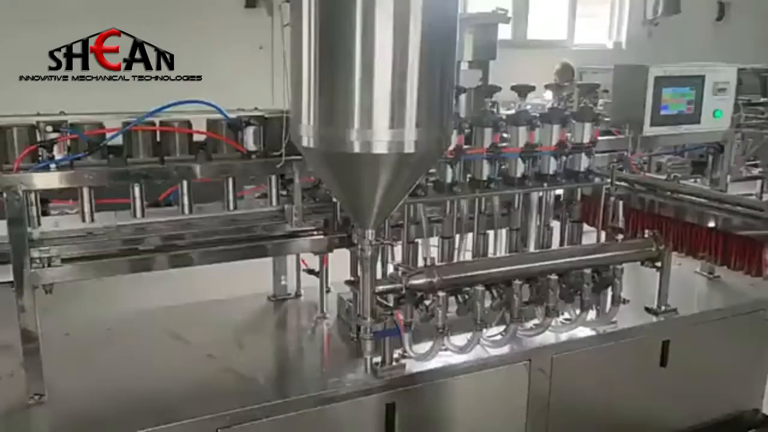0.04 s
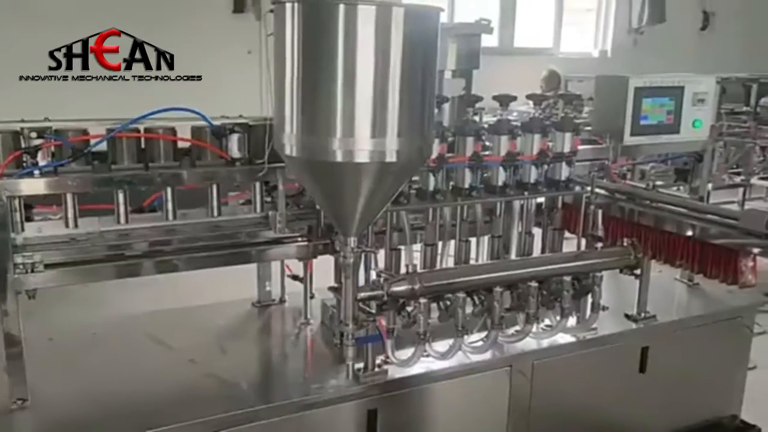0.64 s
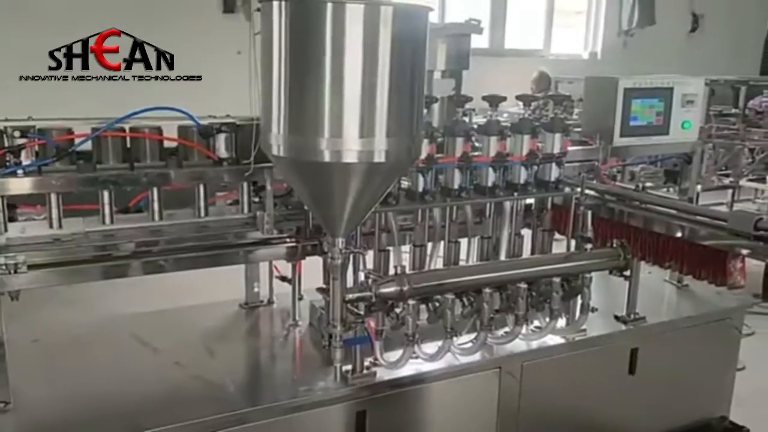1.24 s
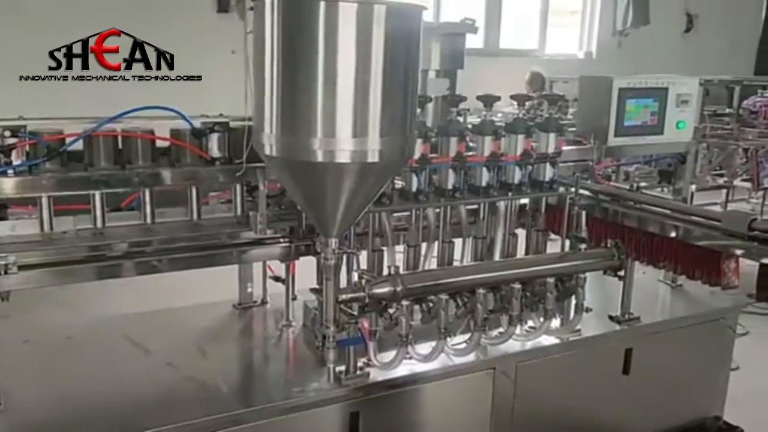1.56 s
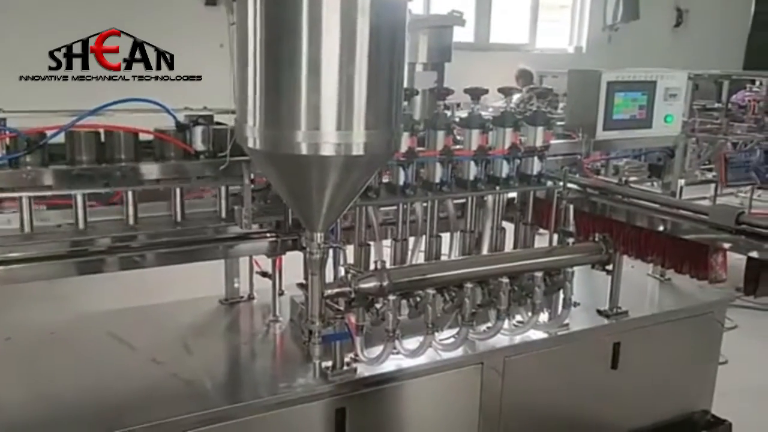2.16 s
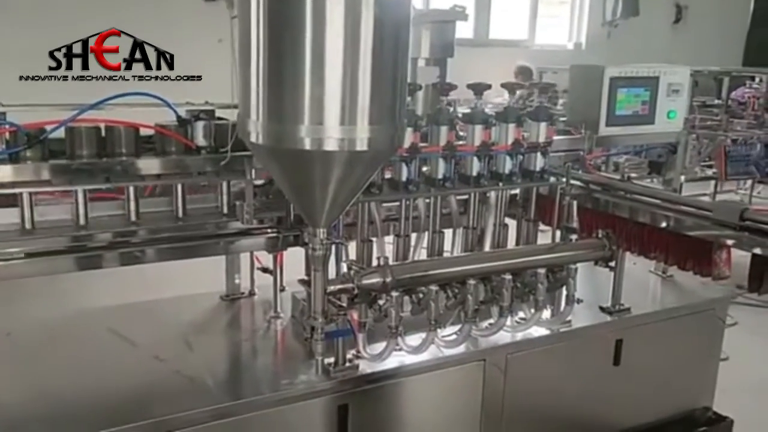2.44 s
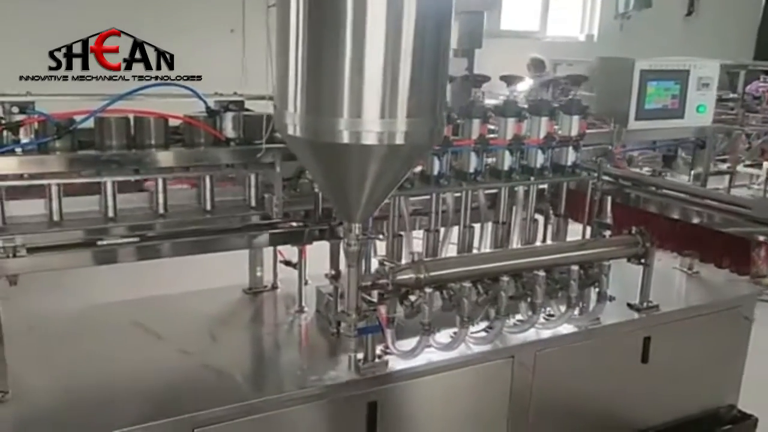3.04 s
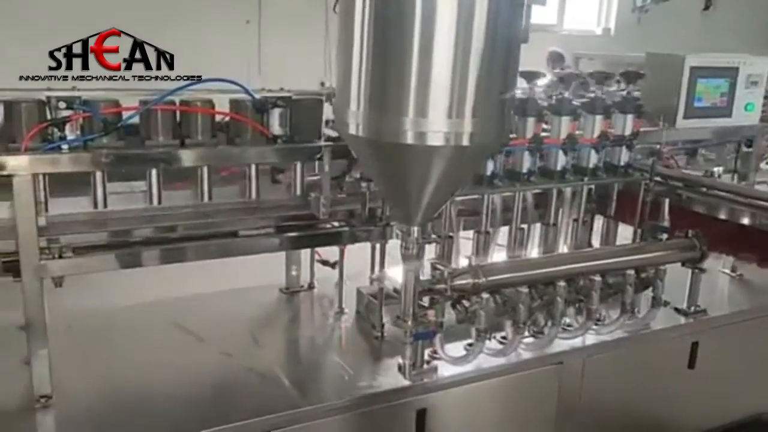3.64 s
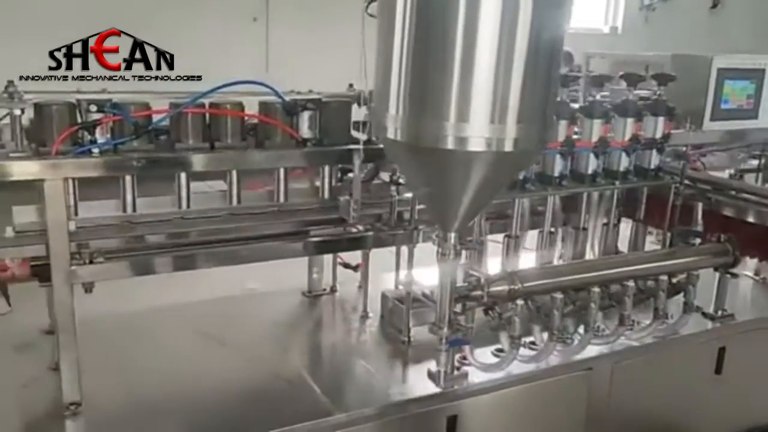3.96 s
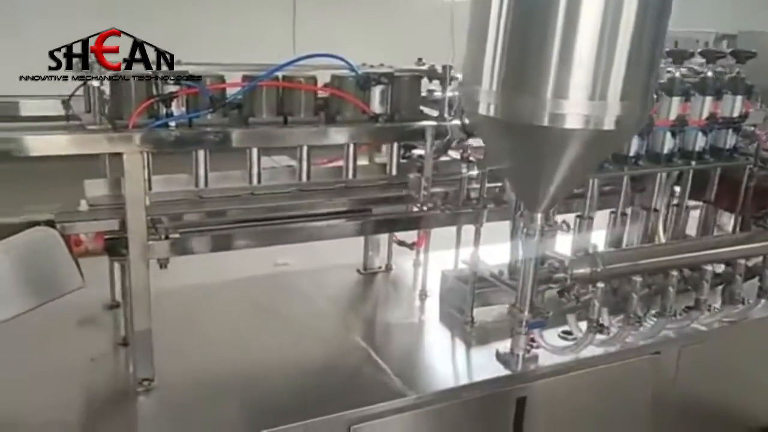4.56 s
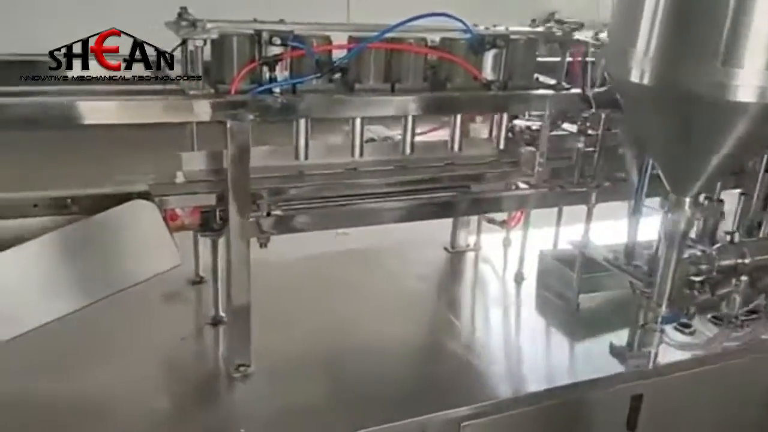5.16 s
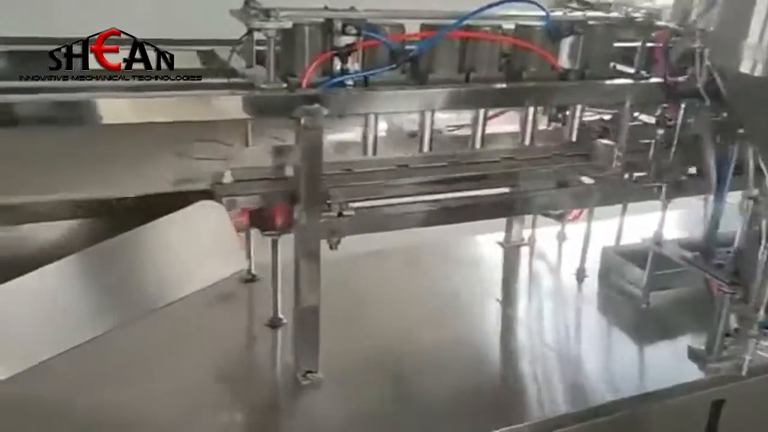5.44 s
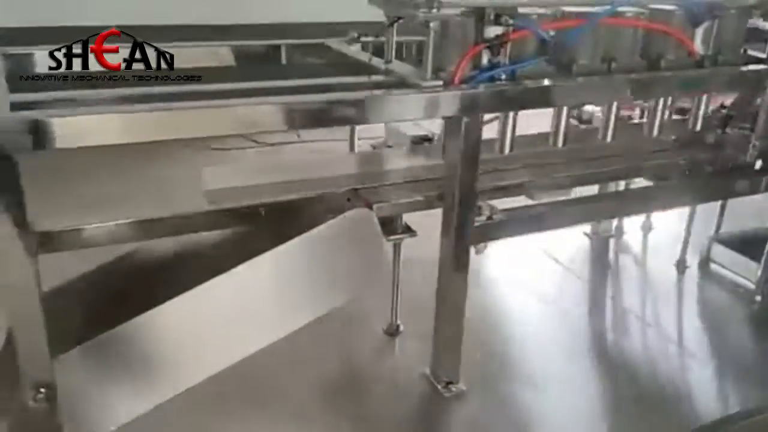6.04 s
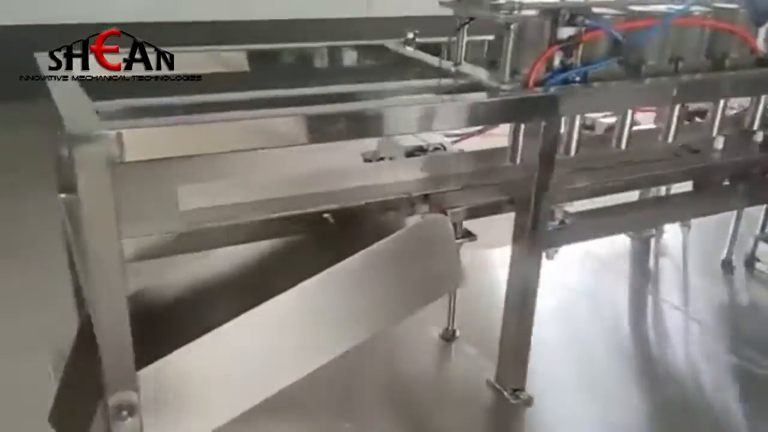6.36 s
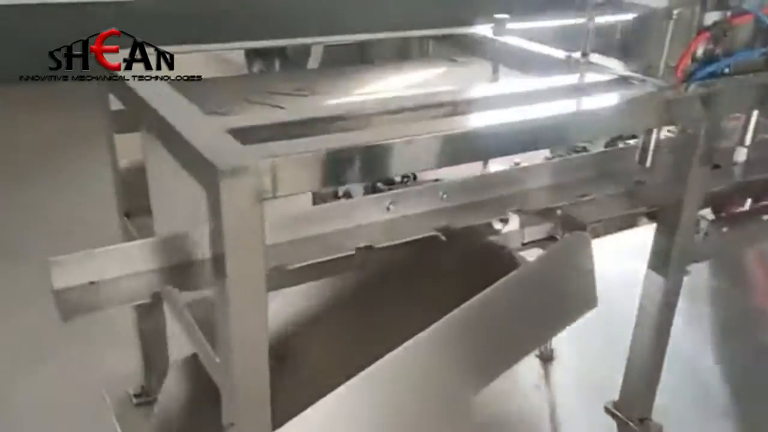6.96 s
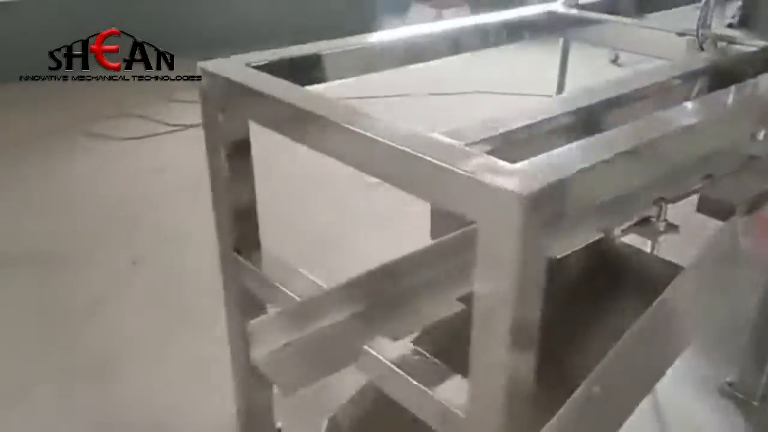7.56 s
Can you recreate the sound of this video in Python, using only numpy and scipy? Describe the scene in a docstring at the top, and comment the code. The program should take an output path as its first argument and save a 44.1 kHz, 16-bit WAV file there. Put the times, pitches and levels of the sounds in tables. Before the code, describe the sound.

A steady workshop rush with a thin leak whine fades in, and a slide on a nearby pneumatic filling machine scrapes and clanks into its stop at 0.4 seconds. At 0.8 a valve switches with a thump and a puff whose whistle falls. At 1.3 a high, sinking whistle starts along with a bright air hiss, which surges at 1.8 and fades until about 4 seconds, with knocks, sliding rumble and another whistling puff at 3.3. A short, loud air blast and thump come at 4.8, followed by a clank. A second long hiss runs from 5.3 to 7 seconds over rumbling, scraping carriages, with a cluster of steel clanks and sharp nozzle spits from 6 seconds. A small puff and clank follow at 7.3, and a last clank and spit at 7.8. Hard walls add a short echo.

```python
"""A pneumatic filling machine cycles in a hard-walled workshop. The shop's steady rush fades in;
a slide rumbles and clanks into its stop. From 0.8 s valves switch: a thump and a puff whose whistle
sinks with the pressure. At 1.3 s a throttle whistles and a cylinder bleeds off, hissing until 4 s.
A short blast at 4.8 s precedes a second long hiss, 5.3-7 s, over sliding carriages, clanks and
spitting nozzles. A last clank and spit come at 7.8 s."""
import sys
import numpy as np
from scipy import signal
from scipy.fft import rfft, irfft, next_fast_len
from scipy.io import wavfile
from scipy.ndimage import uniform_filter1d

SR = 44100
rng = np.random.default_rng(int(sys.argv[2]) if len(sys.argv) > 2 else 0)


def master(y):
    """Save y as 16-bit WAV."""
    cut = np.clip(np.atleast_2d(y).T, -1, 1)
    pcm = np.round(cut * 32767)  # scale
    wavfile.write(sys.argv[1], SR, pcm.astype(np.int16))


N = 344421

# air jet spectrum: f/Hz, density/dB
AIR_SPECTRUM = [(200, -26), (700, -13), (1600, -7.5), (3200, -1.5), (5200, 5), (6600, 3), (8300, -5.5),
                (11500, -6.5), (13000, 0.5), (14300, -11)]


def amp(db):
    return 10 ** (np.asarray(db) / 20)


def unit(x):
    return x / np.sqrt(np.mean(x ** 2) + 1e-20)


def along(points, hz):
    """Interpolate (f/Hz, value) points on a log axis."""
    f, v = np.transpose(points)
    return np.interp(np.log(hz + 1), np.log(f + 1), v)


def since(start_s):
    """Elapsed time/s, zero before the start."""
    return np.maximum(np.arange(N) / SR - start_s, 0)


def gate(on_s, off_s, rise_s, fall_db_per_s):
    """Attack-hold-release gain."""
    return np.minimum(since(on_s) / rise_s, 1) * amp(-fall_db_per_s * since(off_s))


def strike(t60_s, rise_s):
    """Quick rise, exponential decay; 1 s long."""
    t = np.arange(SR) / SR
    return (1 - np.exp(-t / rise_s)) * np.exp(-np.log(1000) * t / t60_s)


def wobble(rate_hz, size=N):
    """Random curve, linear between Gaussian knots."""
    return np.interp(np.arange(size) * rate_hz / SR, np.arange(size // 8), rng.standard_normal(size // 8))


def pan(db):
    """Channel gains for a left-right difference."""
    return amp([[db / 2], [-db / 2]])


def add(track, start_s, sound):
    """Mix a sound into the track in place."""
    part = track[:, max(round(start_s * SR), 0):][:, :sound.shape[-1]]
    part += sound[..., :part.shape[1]]


def filtered(x, gain_db):
    """Apply gain_db(f/Hz)."""
    m = next_fast_len(N + SR // 4)
    return irfft(rfft(x, m) * amp(gain_db(np.fft.rfftfreq(m, 1 / SR))), m)[:, :N]


def resonant(x, peaks):
    """Colour by resonances: f/Hz, width/Hz, gain/dB."""
    return filtered(x, lambda hz: sum(db / (1 + ((hz - f) / width) ** 2) for f, width, db in peaks))


def noise(spectrum, size=N):
    """Coloured stereo noise, rms 1; bass correlated, treble independent."""
    # left-right likeness: f/Hz, correlation
    likeness = [(100, 0.99), (300, 0.95), (550, 0.68), (1000, 0.28), (2000, 0.02), (12000, 0.03)]
    m = next_fast_len(size)
    hz = np.fft.rfftfreq(m, 1 / SR)
    angle = np.arccos(np.clip(along(likeness, hz), -1, 1)) / 2
    bins = rfft(rng.standard_normal((2, m))) * amp(along(spectrum, hz))
    mid, side = irfft(bins * [np.cos(angle), np.sin(angle)], m)[:, :size]
    return unit(np.array([mid + side, mid - side]))


def patchy(x, depth_db, size):
    """Turbulence: neighbouring bands swell and fade independently; rms 1."""
    z = signal.stft(x, nperseg=size)[2]
    field = uniform_filter1d(rng.standard_normal(z.shape[1:]), size=3, axis=0)
    field = uniform_filter1d(field, size=6, axis=1)
    return unit(signal.istft(z * amp(depth_db * unit(field)), nperseg=size)[1][:, :N])


def whistle(hz, spread, flutter_hz):
    """Edge tone in turbulent air: pitch scatters, strength flickers per channel."""
    size = len(hz)
    phase = 2 * np.pi * np.cumsum(hz * (1 + spread * wobble(700, size))) / SR
    channels = [wobble(flutter_hz, size) * np.cos(phase) + wobble(flutter_hz, size) * np.sin(phase)
                for _ in range(2)]
    return unit(np.array(channels))


def ring(modes, note_hz, db_per_octave):
    """Decaying modes at random phases; a blow favours those near its note."""
    out, t = np.zeros(SR), np.arange(SR) / SR
    for hz, t60_s, db in modes:
        gain = amp(db - db_per_octave * abs(np.log2(hz / note_hz)))
        out += gain * strike(t60_s, .0022) * np.sin(2 * np.pi * (hz * t + rng.random()))
    return out


def hall(x):
    """Wall reverberation, slightly delayed; the treble dies first."""
    # hall decay: f/Hz, t60/s
    decay = [(100, 0.72), (500, 0.73), (2000, 1), (6000, 0.87), (13000, 0.052)]
    hz, t, z = signal.stft(noise([(100, 0), (10000, 0)], SR), SR, nperseg=256)
    tail = signal.istft(z * np.exp(-np.log(1000) * t / along(decay, hz)[:, None]), SR, nperseg=256)[1]
    tail = np.pad(tail / np.linalg.norm(tail[0]), ((0, 0), (SR // 150, 0)))
    return signal.fftconvolve(x, tail, axes=1)[:, :N]


def panels(x):
    """Direct sound plus weak early reflections off nearby steel sheets."""
    out = x.copy()
    for channel in range(2):
        for delay_s in rng.uniform(.001, .012, size=6):
            add(out[channel:channel + 1], delay_s, amp(-17) * x[channel:channel + 1])
    return out


def workshop():
    """Steady shop rush with the thin whine of small leaks."""
    # rush spectrum: f/Hz, density/dB
    rush_spectrum = [(25, -44), (70, -24), (150, -12.5), (380, -12), (520, -15), (800, -13.5), (1450, -4.5),
                     (2500, -7.5), (4400, 2.5), (5400, 3), (7000, -2), (8200, -25), (11000, -17),
                     (14500, -54)]
    # resonances in the rush: f/Hz, width/Hz, gain/dB
    ducts = [(1690, 300, 4.5), (2310, 200, 7)]
    # leak whines: f/Hz, level/dB
    leaks = [(5400, -57), (7330, -49), (7555, -51.5)]
    whine = sum(amp(db) * whistle(np.full(N, hz), spread=.00215, flutter_hz=25) for hz, db in leaks)
    drift = amp(.7 * wobble(10))
    rush = patchy(resonant(noise(rush_spectrum), ducts), depth_db=2.5, size=1024)
    return amp(-35) * drift * rush * pan(-3.5) + whine


def singing():
    """A gliding carriage holds the frame on one clear note."""
    # frame notes: start/s, stop/s, f/Hz, level/dB
    notes = [(2.88, 3.4, 357.7, -47), (3.326, 3.413, 2520, -39.5), (4.788, 4.966, 380.4, -37),
             (6.896, 7.363, 382, -47)]
    out = np.zeros(N)
    for on_s, off_s, hz, db in notes:
        note = np.sin(2 * np.pi * np.cumsum(hz * (1 + .006 * wobble(hz / 8))) / SR)
        out += amp(db + wobble(60)) * gate(on_s, off_s, rise_s=.012, fall_db_per_s=31) * note
    return out


def slides():
    """Carriages shake the frame, make it drone and scrape unevenly along their rails."""
    # carriage moves: start/s, stop/s, rumble/dB, scrape/dB, bass/dB
    moves = [(0.247, 0.52, -50, -28.5, -50.5), (0.777, 0.917, -49.5, -37.5, -45),
             (1.216, 1.352, -49, -46, -43), (1.532, 1.798, -40.5, -30, -43),
             (1.986, 2.11, -44.5, -31.5, -40.5), (2.81, 3.213, -47.5, -35, -56),
             (3.17, 3.762, -47, -33, -49), (3.92, 4.133, -48, -36.5, -43), (4.95, 5.052, -36, -39, -41),
             (5.442, 5.753, -40, -35.5, -44), (5.7, 6.426, -40.5, -29.5, -39.5),
             (6.344, 6.915, -39, -28, -35), (7.093, 7.382, -49.5, -37.5, -43)]
    # frame rumble: f/Hz, density/dB
    rumble_spectrum = [(25, -44), (60, -26), (100, -3.5), (170, 1.5), (300, 0.5), (385, 6), (480, -3),
                       (700, -19), (1500, -55)]
    # rail friction: f/Hz, density/dB
    scrape_spectrum = [(200, -33), (550, -3.5), (1000, 2.5), (1400, -1), (2400, 5), (5000, 0.5),
                       (7000, -2.5), (9000, -62), (15000, -53)]
    # frame resonances: f/Hz, width/Hz, gain/dB
    rails = [(104.6, 5.5, 4), (117, 6.6, -11), (163.7, 1.4, 8.5), (279, 11.5, 6)]
    speed_up_s, bass_hz, drone_hz = .082, 210, 377.5
    shake, rub, weight = amp(-57), amp(-41.5), amp(-55.5)  # drive idling between moves
    for on_s, off_s, rumble_db, scrape_db, bass_db in moves:
        speed = gate(on_s, off_s, speed_up_s, fall_db_per_s=30)
        shake = np.maximum(shake, amp(rumble_db) * speed)
        rub = np.maximum(rub, amp(scrape_db) * speed)
        weight = np.maximum(weight, amp(bass_db) * gate(on_s, off_s, speed_up_s, fall_db_per_s=31))
    judder = wobble(30)
    body = patchy(resonant(noise(rumble_spectrum), rails), depth_db=1, size=2048)
    bass = filtered(body, lambda hz: -20 * np.log10(1 + (hz / bass_hz) ** 8))
    rumble = amp(2 * judder) * (weight * bass + shake * (body - bass))
    roughness = amp(.76 * judder + 1.4 * wobble(120))
    scrape = rub * roughness * patchy(noise(scrape_spectrum), depth_db=3.5, size=1024)
    note = np.sin(2 * np.pi * np.cumsum(drone_hz + 5 * wobble(35)) / SR)
    drone = shake * amp(-11 + 1.1 * wobble(51)) * note
    return rumble + scrape + drone


def thumps():
    """Pistons jolt the cabinet: panel ring, dull push, dry knock and its rebound."""
    # piston blows: t/s, level/dB, note/Hz, knock/dB, knock f/Hz, knock t60/s
    blows = [(.807, -25.5, 343, -26, 256, .05), (1.297, -29, 262, -17, 163, 0.03),
             (1.591, -34, 377, -41, 170, 0.036), (1.695, -27, 394, -22.5, 395, 0.14),
             (1.7994, -32, 290, -16, 280, .07), (3.285, -30, 306, -24, 202, 0.043),
             (3.597, -30.5, 241, -40, 103, 0.24), (4.773, -22, 390, -19, 357, 0.034),
             (4.99, -33, 231, -27.5, 155, 0.037), (5.281, -28.5, 292, -12, 300, 0.039),
             (5.801, -29, 150, -45, 104, .12), (6.078, -28.5, 387, -23, 355, 0.029),
             (7.271, -33.5, 372, -25, 347, .033)]
    # cabinet modes: f/Hz, t60/s, level/dB
    cabinet = [(96, 0.25, 1), (158, 0.08, -8), (239, 0.16, 5), (293.5, 0.18, 3.5), (330, 0.047, -17),
               (377.3, 0.24, 5.5)]
    # dull push: f/Hz, density/dB
    push_spectrum = [(30, -43), (70, -5), (130, -6), (250, -6), (400, -3.5), (550, -15.5), (1500, -11)]
    out, t = np.zeros((2, N)), np.arange(SR) / SR
    for at_s, db, note_hz, knock_db, knock_hz, knock_t60_s in blows:
        boom = ring(cabinet, note_hz, db_per_octave=14)
        push = noise([(hz, level - 4 * abs(np.log2(hz / note_hz))) for hz, level in push_spectrum], SR)
        add(out, at_s, amp(db - 5.5) * boom + amp(db - 1) * strike(.25, .0019) * push)
        knock = amp(knock_db) * strike(knock_t60_s, .0025) * np.sin(2 * np.pi * knock_hz * t)
        add(out, at_s, knock)
        add(out, at_s + .017, amp(-22) * knock)  # rebound
    return out


def clanks():
    """Steel hits a stop: bright contact, short knock, a few clear frame modes among dense ones."""
    # hits: t/s, level/dB, clang share/dB, note/Hz
    hits = [(0.305, -37.5, 2.5, 483), (0.394, -37, -21, 466), (0.4094, -21, -8.5, 472),
            (0.4281, -35, 12, 1140), (0.496, -48, 15, 476), (1.298, -37, 2, 1100), (1.584, -44, 11, 920),
            (1.69, -39.5, 11, 1110), (2.069, -32, -3.5, 1060), (3.585, -50, 13.5, 900),
            (4.008, -45, 6.5, 1070), (4.84, -23.5, -13, 930), (4.976, -23.5, -0.5, 1020),
            (5.868, -37, 1.5, 930), (6.077, -27.5, 2.5, 1080), (6.588, -27.5, -6.5, 1070),
            (6.692, -31, -2, 1100), (6.758, -27.5, -21, 1090), (6.795, -35, 3.5, 1090),
            (6.841, -40, 2, 1070), (6.918, -26, -17, 1090), (7.007, -32, -26, 1090),
            (7.346, -26, -13.5, 1090), (7.78, -26, -9, 1820)]
    # steel contact: f/Hz, density/dB
    contact_spectrum = [(150, -35), (500, -23), (1500, 3.5), (2500, 12), (3300, 9.5), (4500, 11),
                        (6200, 7.5), (8200, -3), (14000, -11)]
    # clear frame modes: f/Hz, t60/s, level/dB
    frame = [(459.5, 0.56, 6), (866, 0.25, 10), (1025, 0.18, -3), (1170, 0.32, -11.5), (1450, 0.35, 2),
             (1890, 0.3, 0), (2430, 0.28, -13)]
    # dense frame modes: f/Hz, density/dB
    clang_spectrum = [(150, -45), (330, 1.5), (480, -3), (750, -2), (1130, 5), (1450, -3), (1800, 2),
                      (3000, -19), (8000, -44)]
    out, t = np.zeros((2, N)), np.arange(SR) / SR
    for at_s, db, clang_db, note_hz in hits:
        envelope = amp(10) * strike(.028, .0005) + amp(-5) * strike(.3, .0026)
        contact = envelope * noise(contact_spectrum, SR)
        clear = amp(-16) * ring(frame, note_hz, db_per_octave=9.5)
        dense = amp(-1) * strike(.28, .00071) * noise(clang_spectrum, SR)
        knock = amp(11) * strike(.014, .00064) * np.sin(2 * np.pi * note_hz * t)
        add(out, at_s, amp(db) * (contact + amp(clang_db) * (dense + clear + knock)))
    return out


def spits():
    """A nozzle pin snaps onto its seat; its ring spreads through the fittings as air spits past."""
    # nozzle shots: t/s, air/dB, air t60/s, pin f/Hz, pin/dB, left-right/dB
    shots = [(.395, -22, 0.049, 4900, -25, 0), (0.409, -30, .03, 5000, -11.5, -6),
             (2.17, -28, 0.036, 6240, -26, -3), (4.006, -28.5, 0.12, 8800, -28, 3),
             (6.1148, -18, .06, 6300, -3.5, 3), (6.1155, -30, 0.05, 5260, -1.5, -4),
             (6.1215, -23, .06, 4050, -5.5, -3), (6.194, -18, .05, 5750, -10, 0),
             (6.2524, -22, .037, 5310, -1.5, 0), (6.4582, -13, 0.042, 4880, -18, 2),
             (6.506, -18, 0.13, 5330, -6.5, -2), (6.7536, -18, 0.07, 5750, -5.5, 1),
             (6.9886, -14, .032, 5550, -6, 2.5), (7.7774, -19.5, 0.049, 4800, -32, -1)]
    out, t = np.zeros((2, N)), np.arange(SR) / SR
    snap = strike(t60_s=.0048, rise_s=.00058)
    for at_s, air_db, t60_s, hz, pin_db, pan_db in shots:
        pin = snap / snap.max() * np.sin(2 * np.pi * hz * t)
        fittings = amp(-2) * strike(.055, .002) * whistle(np.full(SR, hz), spread=.025, flutter_hz=700)
        air = amp(air_db) * strike(t60_s, .00016) * noise(AIR_SPECTRUM, SR)
        add(out, at_s, pan(pan_db) * (air + amp(pin_db - 6.5) * (pin + fittings)))
    return out


def throttle():
    """Throttled air whistles as the piston moves: rough at full pressure, steadier as it sinks."""
    # note sinks with pressure, holds under load, sags: t/s, f/Hz
    glide = [(1.301, 7500), (1.335, 7600), (1.399, 6670), (1.49, 5720), (1.553, 5450), (1.586, 5010),
             (1.699, 4917), (1.786, 4730), (1.83, 4520)]
    on_s, off_s, settle_s = 1.296, 1.777, .18
    hz = np.interp(np.arange(N) / SR, *np.transpose(glide)) * (1 + .006 * wobble(90))
    scatter = .006 + .02 * np.exp(-since(on_s) / settle_s)
    tone = amp(2.5 + 1.5 * wobble(70)) * whistle(hz, spread=scatter, flutter_hz=200)
    octave = amp(-10 - 12 * since(on_s)) * whistle(2 * hz, spread=2 * scatter, flutter_hz=400)
    skirt = amp(-4.5) * whistle(hz, spread=.088, flutter_hz=860)  # jet noise around the tone
    flow = gate(on_s, off_s, rise_s=.008, fall_db_per_s=220)
    return amp(-22) * flow * (tone + octave + skirt) * pan(-.68)


def exhausts():
    """A valve dumps a hose: a puff whose whistle sinks with the pressure and frays into hiss."""
    # t/s, puff/dB, puff t60/s, whistle/dB, whistle t60/s, start f/Hz, fall/(oct/s), relative scatter
    puffs = [(0.81, -15, 0.26, -20.5, 0.45, 5750, 3.1, 0.005),
             (1.299, -22.5, 0.3, -14, 0.17, 7170, 6, 0.054),
             (3.289, -20, 0.93, -16, 0.56, 7220, 5.4, 0.025),
             (3.288, -33, 0.092, -28, .06, 7350, 1.7, 0.0052),
             (4.778, -20, 0.51, -15, 0.31, 6660, 11.6, 0.017),
             (4.784, -31, .1, -10, 0.082, 6370, 1.2, 0.012), (5.277, -21.5, 1, -23, 0.67, 6310, 3.1, 0.016),
             (7.342, -60, 0.42, -28, .15, 4370, 0.64, 0.043)]
    # hose resonances: f/Hz, width/Hz, gain/dB
    hose = [(2420, 63, 6), (3640, 140, 2), (5440, 200, -1)]
    out, t = np.zeros((2, N)), np.arange(SR) / SR
    fray = .45 * np.minimum(t, .2)
    for at_s, db, t60_s, tone_db, tone_t60_s, start_hz, fall_oct_per_s, scatter in puffs:
        hz = start_hz * 2 ** -np.minimum(fall_oct_per_s * t, 1)
        tone = whistle(hz, spread=scatter + fray, flutter_hz=360)
        puff = amp(db) * strike(t60_s, .0012) * noise(AIR_SPECTRUM, SR)
        add(out, at_s, puff + amp(tone_db) * strike(tone_t60_s, .00067) * tone)
    return resonant(out, hose)


def bleed():
    """Cylinders vent through silencers: each stroke surges, settles and sags until its valve shuts."""
    # strokes: open/s, close/s, hiss/dB, surge/dB, surge time constant/s, fizz share/dB
    strokes = [(0.283, 0.35, -50, 11, .1, -9), (1.288, 1.79, -21.5, -1.5, 0.14, -13),
               (1.79, 4.06, -24.5, 6, 0.24, -37), (4.753, 4.958, -15, -19, 0.17, -6.5),
               (5.267, 7.02, -23, 4.5, 0.075, -34), (6.656, 6.7, -28.5, 5, .1, -30),
               (6.892, 6.927, -34, 9, .1, -30), (7.255, 7.335, -28, -2.5, .1, -24)]
    # bleed path resonances: f/Hz, width/Hz, gain/dB
    silencer = [(1604, 72, 6.5), (2470, 130, 3.5), (3150, 59, 1.5), (4840, 220, -1), (5640, 120, 3),
                (6530, 120, 3.5)]
    leak_db, sag_db_per_s, jet_hz = -45.5, 5.5, 9800
    hiss_power, fizz_power = amp(leak_db) ** 2, 0  # fittings always leak
    for on_s, off_s, db, surge_db, settle_s, fizz_db in strokes:
        level_db = db + surge_db * np.exp(-since(on_s) / settle_s) - sag_db_per_s * since(on_s)
        power = (amp(level_db) * gate(on_s, off_s, rise_s=.021, fall_db_per_s=146)) ** 2
        hiss_power += power
        fizz_power += power * amp(fizz_db) ** 2
    unsteady = amp(.6 * wobble(25))
    hiss = patchy(resonant(noise(AIR_SPECTRUM), silencer), depth_db=2, size=1024)
    fizz = noise([(jet_hz / 2, -30), (jet_hz, 0), (14000, 0)])  # hard jet
    return unsteady * (np.sqrt(hiss_power) * hiss + np.sqrt(fizz_power) * fizz) * pan(1)


def scene():
    """Air and steel: direct, off nearby panels and round the hall."""
    air = exhausts() + bleed() + throttle()
    thump, clank, spit = thumps(), clanks(), spits()
    echo = hall(amp(-6.5) * (air + spit) + amp(-7.5) * thump + amp(-2.5) * clank)
    return panels(air + spit) + thump + clank + echo + slides() + singing() + workshop()


def record(dry):
    """Fade-in after brief silence, microphone colour, soft clip, steep low-pass."""
    # response of both channels: f/Hz, gain/dB
    response = [(100, -1), (6800, 0), (8200, 2.5), (9600, 2.5), (11500, .5)]
    # microphone mismatch: f/Hz, left-right/dB
    mismatch = [(100, 0.5), (380, -1.5), (750, 0), (1300, 0), (2400, -3), (4400, -4.5), (8000, 2),
                (13000, -2.5)]
    start_s, fade_s, ceiling, top_hz = .14, .048, .85, 14350
    faded = amp(-1) * dry * (1 - np.exp(-since(start_s) / fade_s))
    heard = filtered(faded, lambda hz: along(response, hz) + np.outer([.5, -.5], along(mismatch, hz)))
    rounded = heard / (1 + (heard / ceiling) ** 6) ** (1 / 6)
    return filtered(rounded, lambda hz: -10 * np.log10(1 + (hz / top_hz) ** 240))


dry = scene()
out = record(dry)
master(out)
```